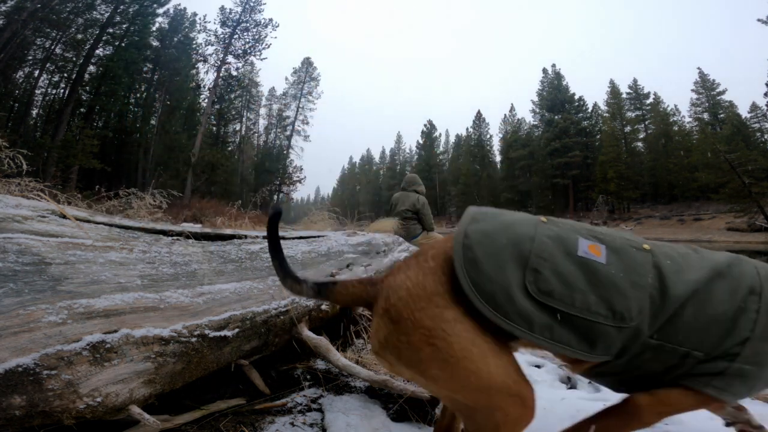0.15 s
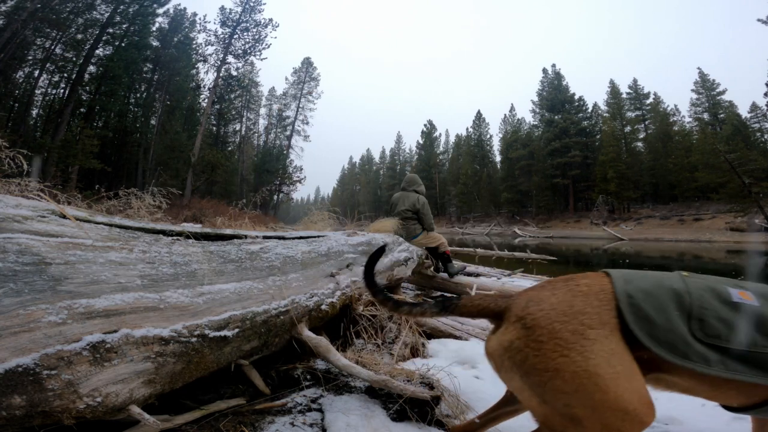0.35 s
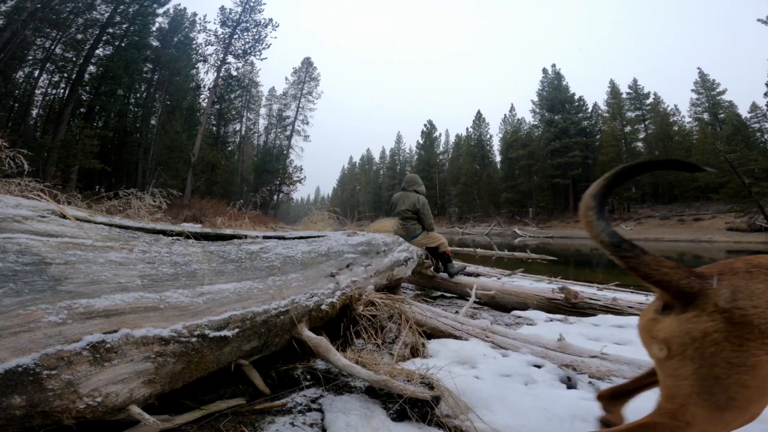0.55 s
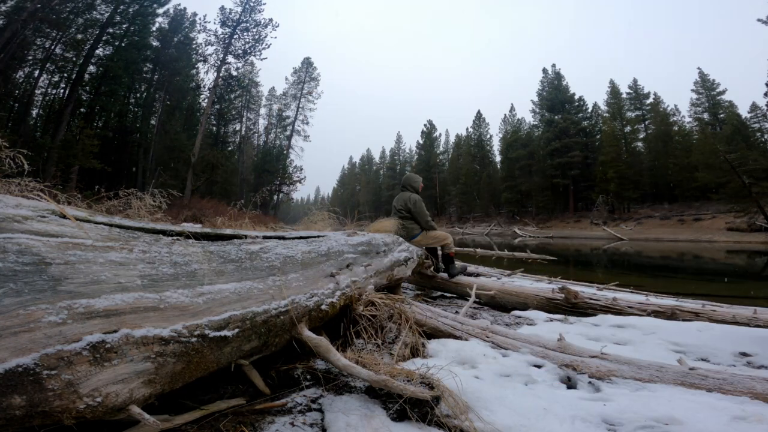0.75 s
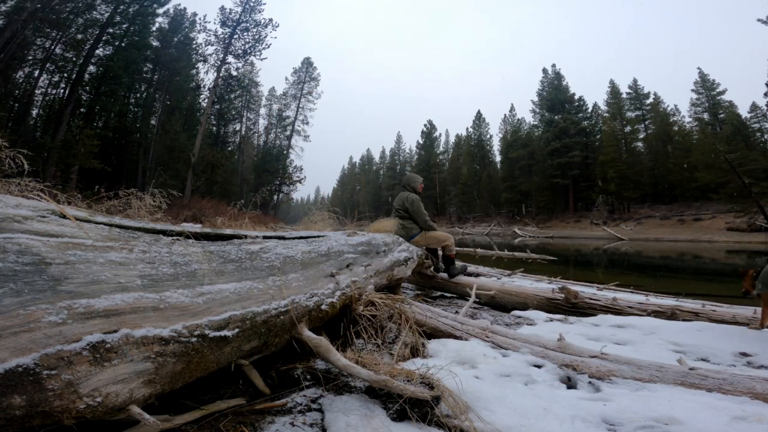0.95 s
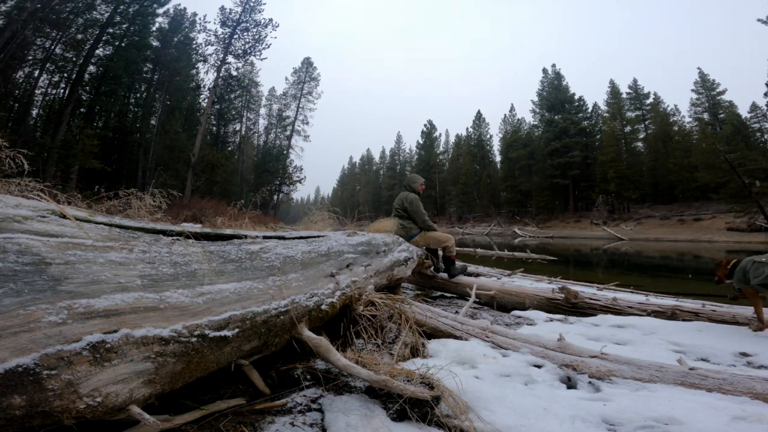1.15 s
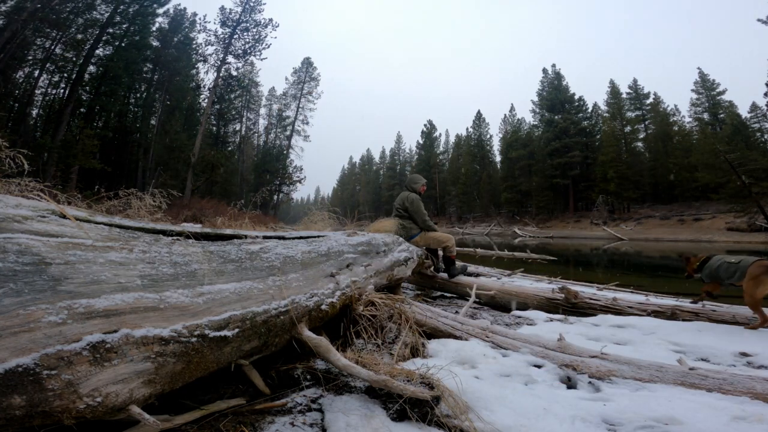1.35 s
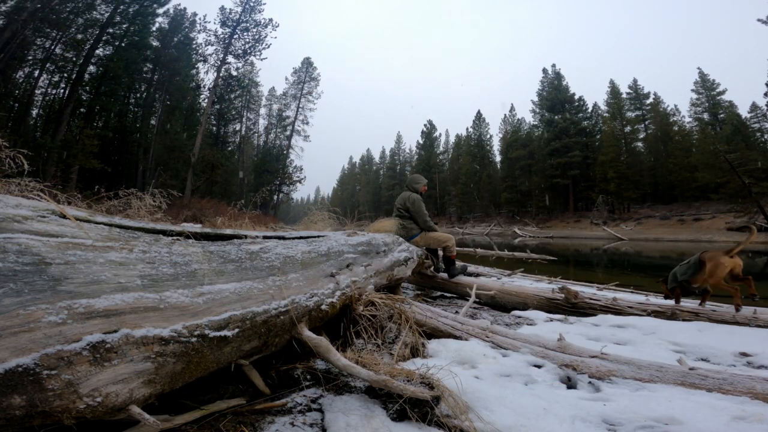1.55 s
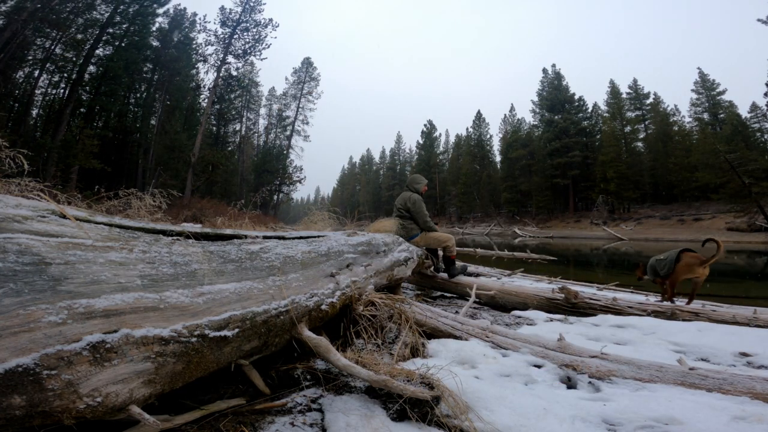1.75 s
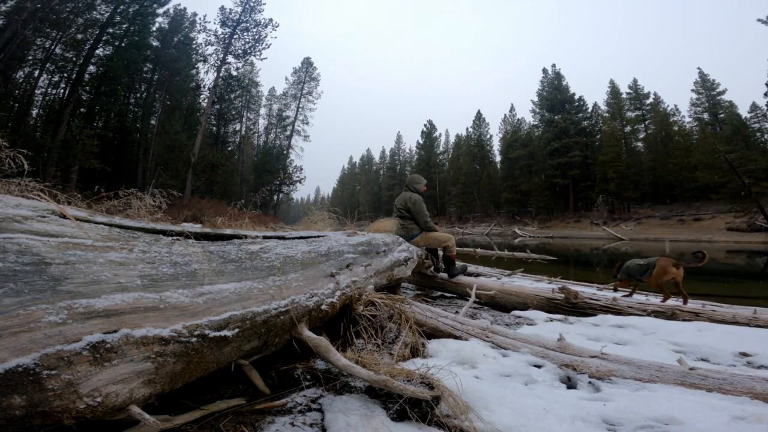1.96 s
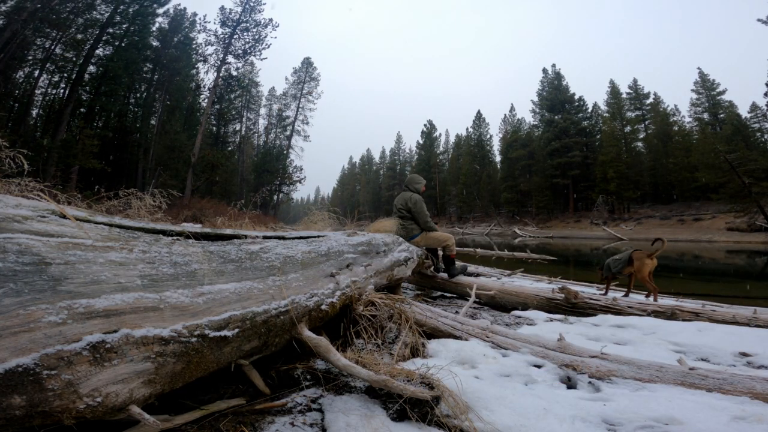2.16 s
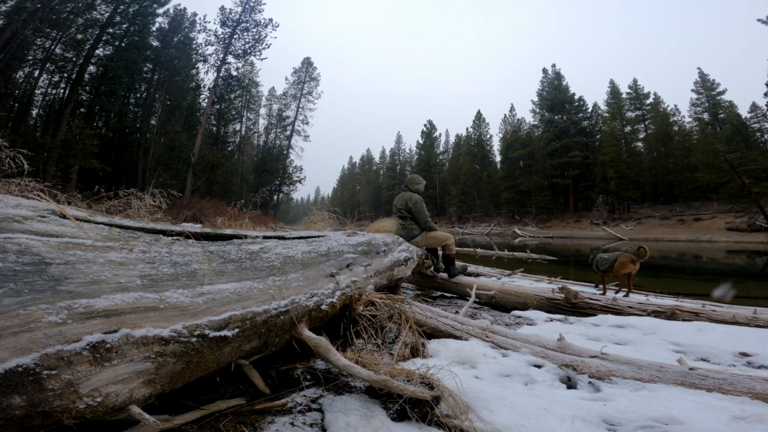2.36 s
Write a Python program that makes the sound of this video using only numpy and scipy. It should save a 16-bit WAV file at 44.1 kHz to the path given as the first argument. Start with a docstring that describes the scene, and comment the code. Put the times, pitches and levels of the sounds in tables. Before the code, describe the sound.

Dog jumping down from an icy log, scraping and snapping crust, then lighter steps receding right

```python
"""A dog jumps off a frosty log beside the listener: paws scrape, snap the crust, thump and knock on the log.
It trots away to the right along a river bank; on the left a small bird calls six times and the forest answers.
Farther off, packed snow squeaks under the paws, and near the end, before the last faint scrapes, a faint tone
rises and falls; a low hum lies under all. Crunches are noise from resonant ice grains, thumps, knocks and hum
are coloured noise, and squeaks, calls and the tone are sines of unsteady phase."""
import sys
import numpy as np
from scipy import signal
from scipy.fft import rfft, irfft, next_fast_len
from scipy.io import wavfile
from scipy.ndimage import uniform_filter1d, map_coordinates

SR = 44100
rng = np.random.default_rng(int(sys.argv[2]) if len(sys.argv) > 2 else 0)


def dump_mix(stems):
    """Bounce the given channels to the path in sys.argv[1] as a 16-bit WAV at rate SR."""
    frames = np.atleast_2d(stems).T  # one column per channel
    limited = np.clip(frames, -1, 1)  # hard clip at full scale
    pcm = np.round(limited * 32767).astype(np.int16)
    wavfile.write(sys.argv[1], SR, pcm)


N = 110250


def amp(db):
    """Amplitude ratio: every 20 dB is a factor of ten."""
    return 10 ** (np.asarray(db) / 20)


def unit(x):
    """Normalisation by mean power: scale to rms 1."""
    return x / np.sqrt(np.mean(x ** 2) + 1e-20)


def along(points, hz):
    """Spectral interpolation: values between (f/Hz, value) points on a log frequency axis."""
    f, value = np.transpose(points)
    return np.interp(np.log(hz + 1), np.log(f + 1), value)


def clock():
    """Sampled time: seconds at each sample."""
    return np.arange(N) / SR


def curves(rows):
    """Linear interpolation in time: one value per sample for each column after t/s."""
    s, *columns = np.transpose(rows)
    return [np.interp(clock(), s, column) for column in columns]


def wobble(rate, size=N):
    """Band-limited fluctuation: a smooth curve through random knots, rate of them a second."""
    knots = rng.standard_normal(size // 16 + 4)
    return map_coordinates(knots, [np.arange(size) * rate / SR])


def filtered(x, response):
    """Linear filtering: the spectrum of x times a response of frequency in Hz."""
    m = next_fast_len(N + SR // 2)  # padded against wrap-around
    return irfft(rfft(x, m) * response(np.fft.rfftfreq(m, 1 / SR)), m)[..., :N]


def noise(colour):
    """Spectral shaping: white noise coloured by (f/Hz, level/dB) points, at rms 1."""
    return unit(filtered(rng.standard_normal(N), lambda hz: amp(along(colour, hz))))


def steady(x, window_s):
    """Power levelling: divide a texture by its running rms."""
    power = uniform_filter1d(x ** 2, max(int(window_s * SR), 8))
    return x / np.sqrt(np.abs(power) + 1e-9)


def envelope(rows, attack_s, release_s):
    """Power addition of incoherent events: linear attack, hold and exponential release of each row."""
    t, power = clock(), np.zeros(N)
    for s, length, db in rows:
        near = slice(*np.searchsorted(t, [s - attack_s, s + length + 10 * release_s]))
        age = t[near] - s
        attack = np.clip(age / attack_s + .5, 0, 1)  # half-way up at the stated time
        release = np.exp(-np.maximum(age - length, 0) / release_s)
        power[near] += (amp(db) * attack * release) ** 2
    return np.sqrt(power)


def placed(s, sound):
    """Time shift: a short sound set at its time in silence."""
    return np.pad(sound, (round(s * SR), N))[:N]


def note(pitch_hz, rough):
    """Phase modulation: a sine whose phase trembles by about rough radians."""
    phase = 2 * np.pi * np.cumsum(pitch_hz) / SR
    return np.sin(phase + rough * wobble(900, size=len(pitch_hz)))


def spread(source):
    """Mid-side stereo: a central source with unrelated scatter from a second draw at the sides."""
    # how wide the scatter is: f/Hz, side level/dB
    side_width = [(60, -19.5), (160, -18), (300, -15), (600, -16.5), (1200, -15), (2500, -11),
                  (5000, -13.5), (9000, -16), (13000, -10)]
    mid = source()
    side = filtered(source(), lambda hz: amp(along(side_width, hz)))
    return np.array([mid + side, mid - side])


def air():
    """Coloured stationary noise: a wavering low hum with faint hiss."""
    # spectrum of the outdoor hum: f/Hz, level/dB
    hum_colour = [(20, -18), (105, -12.5), (135, -10), (160, 2.5), (210, 0), (270, -11), (400, -18.5),
                  (800, -35.5), (2000, -22.5), (6000, -29), (12000, -35), (16000, -64.5)]
    hum_db, waver_db = -66.5, 0.8
    return amp(hum_db + waver_db * wobble(7.73)) * noise(hum_colour)


def low_tone():
    """Frequency glide: one faint tone rises and falls."""
    # path of the tone: t/s, f/Hz, level/dB
    glide = [(2.16, 223, -68), (2.2, 309.4, -68.5), (2.245, 284, -67), (2.29, 218, -78.5)]
    hz, db = curves(glide)
    sounding = (clock() > glide[0][0]) * (clock() < glide[-1][0])
    return amp(db) * note(hz, 0.14) * sounding


def whistle(s, length, hz, fall, rough):
    """Frequency and amplitude modulation: one falling, fluttering note."""
    flutter_db = 2
    age = np.arange(SR // 20) / SR
    swell = np.abs(np.sin(np.pi * np.clip(age / length, 0, 1))) ** 0.44
    flutter = amp(flutter_db * wobble(250, size=len(age)))
    return placed(s, swell * flutter * note(hz - fall * age, rough))


def bird():
    """Superposition of partial whistles: a falling call, a high opening note and weaker trailing notes."""
    # calls: t/s, starting f/Hz, fall/(Hz/s), length/s, level/dB, level of the high opening note/dB
    chirps = [(0.824, 4700, 24000, 0.031, -50.5, -74), (0.946, 4890, 28000, 0.035, -44, -62),
              (1.069, 4825, 21200, 0.025, -42, -53), (1.19, 4745, 16500, 0.036, -42.5, -62),
              (1.32, 5024, 32000, 0.028, -44, -62), (1.454, 4807, 24000, 0.023, -41, -57)]
    # notes trailing each call: delay/s, frequency ratio to the main note, relative level/dB, roughness/rad
    side_notes = [(0.02, 0.541, -7.5, 0.73), (0.027, .8, -17, 0.77)]
    chirp_rough = 0.61
    high_ratio, high_s = 1.19, 0.021  # the opening note's pitch over the main one, and its length
    out = np.zeros(N)
    for s, hz, fall, length, db, high_db in chirps:
        out += amp(db) * whistle(s, length, hz, fall, chirp_rough)
        out += amp(high_db) * whistle(s, high_s, hz * high_ratio, 2 * fall, rough=0.72)
        for delay, ratio, rel_db, rough in side_notes:
            out += amp(db + rel_db) * whistle(s + delay, length, hz * ratio, fall * ratio, rough)
    return out


def forest(x):
    """Reverberation by convolution: trees return a long, patchy echo, the far bank a soft late one."""
    echo_db, t60_s, build_up_s, patchy_db = -5.5, 1.8, 0.037, 2.5
    bank_db, bank_delay_s, bank_width_s = -18, 0.286, 0.014
    t = clock()
    decay = amp(-60 * t / t60_s + patchy_db * wobble(37))
    trees = amp(echo_db) * unit(decay * (1 - np.exp(-t / build_up_s)))
    bank = amp(bank_db) * unit(np.exp(-((t - bank_delay_s) / bank_width_s) ** 2))
    tail = rng.standard_normal((2, N))
    tail = unit(tail + tail.mean(axis=0))  # left and right partly alike
    echo = tail * (trees + bank) / np.sqrt(N)
    return signal.fftconvolve(x[None], echo, axes=1)[:, :N]


def squeaks():
    """Stick-slip: each slip of packed snow sings for a few falling cycles around its peak."""
    # slips of packed snow: t of the peak/s, width/s, f at the peak/Hz, peak level/dB
    slips = [(1.590, 0.0048, 1750, -41.5), (1.598, 0.0022, 1657, -30.5), (1.611, 0.0051, 1740, -41),
             (1.664, 0.0022, 1620, -40.5), (1.857, 0.0041, 1980, -52), (1.874, 0.0022, 1900, -36),
             (1.879, 0.0016, 1823, -35), (1.887, 0.0022, 1885, -37), (1.9, 0.0021, 1874, -33),
             (2.037, .002, 1500, -62)]
    rough, sag_hz_per_s = 0.56, 12000
    t = np.arange(-SR // 50, SR // 50) / SR  # time from the peak
    out = np.zeros(N)
    for s, width, hz, db in slips:
        swell = np.exp(-.5 * (t / width) ** 2)
        out += placed(s + t[0], amp(db) * swell * note(hz - sag_hz_per_s * t, rough))
    return out


def footfalls():
    """Impact noise: low thumps and hollow knocks under the paws."""
    # the dog's weight on log and ground: t/s, length/s, level/dB
    thump_rows = [(0, 0.051, -50), (.045, .1, -60), (.205, 0.048, -42.5), (.25, 0.026, -34),
                  (.293, 0.1, -44), (.402, 0.03, -54.5), (.54, 0.044, -52), (.585, 0.035, -55),
                  (.632, 0.024, -51.5), (.928, .02, -74), (1.205, .015, -67), (1.512, 0.019, -50.5),
                  (1.54, 0.042, -60.5), (1.608, 0.019, -56.5)]
    # hollow knocks of paws on driftwood: t/s, length/s, level/dB
    knock_rows = [(.24, 0.034, -47), (.33, 0.06, -49), (.575, 0.027, -45.5), (.70, 0.069, -64),
                  (.86, 0.035, -62.5), (.918, .025, -55), (1.195, 0.022, -58), (1.27, 0.025, -55),
                  (1.35, 0.031, -60), (1.605, .02, -51.5), (1.652, .025, -59), (1.932, .025, -54),
                  (1.985, 0.031, -60.5), (2.145, 0.013, -59)]
    # spectra of thump and of knock: f/Hz, level/dB
    thump_colour = [(20, -26.5), (40, -16), (62, -3.5), (110, -6), (150, -8.5), (260, -33), (600, -60)]
    knock_colour = [(50, -52.5), (110, -33), (155, 9.5), (200, -2.5), (300, -16), (700, -57)]
    thumps = steady(noise(thump_colour), 0.05) * envelope(thump_rows, attack_s=0.015, release_s=0.0049)
    knocks = steady(noise(knock_colour), 0.012) * envelope(knock_rows, attack_s=.009, release_s=0.014)
    return thumps + knocks


def grains(count=14):
    """Random impulses exciting resonators: ice grains ring briefly in clumps, coloured by crust and log."""
    # response of the snow crust: f/Hz, level/dB
    crust = [(70, -14), (160, 4), (280, -11), (350, -4.5), (500, -6.5), (700, -7), (850, -7), (1050, -1.5),
             (1500, 0), (2400, -1), (5000, 0), (7200, -3), (11700, -13), (15500, -27)]
    # resonances of the log: f/Hz, width/Hz, level before the common offset/dB
    wood = [(331, 25, 4.5), (502, 30, -6), (1040, 11.7, -4), (1600, 93, -20), (2029, 22, 1.5)]
    wood_offset_db = -6
    grains_per_s, grain_q = 22000, 3.15  # all pitches together; sharpness of each grain's ring
    size_spread_db, powder_db, clump_db = 3.6, -9, 2.1
    pitches = np.geomspace(200, 14000, count)
    shares = np.sqrt(pitches) / np.sqrt(pitches).sum()  # more of the higher grains
    out = amp(powder_db) * rng.standard_normal(N)
    for hz, share in zip(pitches, shares):
        n = int(grains_per_s * share * N / SR)
        sizes = amp(size_spread_db * np.minimum(rng.exponential(size=n), 3))
        sizes = sizes * rng.choice([-1, 1], n)
        impulses = unit(np.bincount(rng.integers(0, N, n), sizes, N))
        out = out + signal.lfilter(*signal.iirpeak(hz, grain_q, SR), impulses)

    def ring(f):
        """Modal summation: the log's damped resonances add up."""
        return sum(amp(db + wood_offset_db) * 1j * f * width / (centre * centre - f * f + 1j * f * width)
                   for centre, width, db in wood)

    clumped = out * amp(clump_db * wobble(220))
    return unit(filtered(clumped, lambda f: amp(along(crust, f)) * (1 + ring(f))))


def crunch():
    """Band-wise modulation: scrapes and snaps shape grain noise in four bands, over a rustle of loose frost."""
    # paws scraping and crunching: t/s, length/s, then level/dB of body, mids, treble, fizz
    scrapes = np.array([(0.002, 0.016, -50, -51, -60, -55.5), (0.023, 0.12, -64.5, -61, -55.5, -59.5),
                        (0.12, 0.034, -57, -51, -46, -47.5), (0.158, 0.071, -42, -39, -36, -40.5),
                        (0.201, 0.03, -34.5, -33, -29.5, -30.5), (0.238, 0.022, -34, -31, -35, -32.5),
                        (0.256, 0.03, -52.5, -49, -49.5, -50), (0.292, 0.027, -40, -41, -40, -38),
                        (0.325, 0.057, -41, -39, -43, -46), (0.388, 0.062, -71, -81, -62.5, -59.5),
                        (0.456, 0.033, -61, -56, -53, -51.5), (0.499, 0.05, -47, -51, -44.5, -47.5),
                        (0.573, 0.017, -43, -41, -38, -43.5), (0.596, 0.031, -56, -57, -50.5, -53.5),
                        (0.702, 0.017, -58.5, -60.5, -61.5, -57.5),
                        (0.741, 0.026, -61.5, -62, -57.5, -56.5), (0.826, 0.031, -66, -66, -66, -59),
                        (0.851, 0.053, -55.5, -56.5, -56, -55.5), (0.914, 0.013, -50.5, -52, -52.5, -50.5),
                        (0.939, 0.023, -55, -60, -53.5, -59), (0.984, 0.015, -66, -60, -54.5, -64),
                        (1.097, 0.023, -59, -60, -51.5, -59), (1.159, 0.028, -68.5, -59, -69, -61),
                        (1.189, 0.02, -54.5, -52.5, -50, -52.5), (1.232, 0.024, -61, -59, -55, -57),
                        (1.33, 0.048, -71.5, -68.5, -60, -63), (1.486, 0.022, -56, -59.5, -54, -54.5),
                        (1.511, 0.052, -65, -57, -55, -61), (1.587, 0.036, -60, -47, -47, -55.5),
                        (1.87, 0.016, -81, -53, -47, -61), (1.893, 0.033, -71.5, -53.5, -46.5, -64),
                        (1.983, 0.02, -77, -54.5, -58.5, -63), (2.075, 0.02, -85, -61, -59, -69),
                        (2.138, 0.047, -80, -65, -60.5, -70), (2.358, 0.026, -75.5, -71.5, -67.5, -72.5),
                        (2.4, 0.041, -76, -70, -65.5, -70)])
    # crust and twigs snapping: t/s, length/s, then level/dB of body, mids, treble, fizz
    snaps = np.array([(0.026,0.0062,-46.5,-46,-40.5,-41), (.059,0.0015,-70,-52,-48.5,-65),
                      (0.07,0.0017,-70,-65,-50.5,-65), (0.209,0.0048,-49,-49,-24,-27),
                      (0.245,0.0034,-30,-27,-28.5,-31), (0.412,0.0035,-70,-62,-46.5,-64),
                      (0.438,0.0015,-74,-61,-54,-45), (0.562,0.0066,-38.5,-34,-34.5,-35.5),
                      (0.641,0.0063,-47.5,-52,-53.5,-55.5), (0.688,0.005,-54.5,-57.5,-55.5,-50.5),
                      (0.93,0.0027,-40,-49.5,-52,-45.5), (1.006,0.006,-53,-56.5,-49,-55),
                      (1.069,0.0068,-65,-66,-57,-61.5), (1.275,0.0075,-58,-61,-56,-58),
                      (1.291,0.0061,-55,-55.5,-53,-54.5), (1.431,0.0084,-56.5,-57,-52,-52),
                      (1.659,0.0059,-67,-53,-50,-68), (1.915,0.0022,-63,-60,-44.5,-54.5),
                      (1.936,0.0039,-76,-53,-47.5,-63), (1.977,0.0036,-69.5,-57,-54.5,-64),
                      (2.035,0.0039,-74,-58,-66,-67), (2.097,0.002,-82,-61,-63.5,-75),
                      (2.166,0.0034,-73,-64,-49,-70), (2.23,.003,-78,-86,-61,-68),
                      (2.264,0.0035,-74,-77.5,-60.5,-61.5), (2.356,0.0032,-74,-68,-57.5,-54)])
    # edges of those four bands: f/Hz
    band_edges = [180, 900, 2500, 6000, 15000]
    # loose frost between the steps: t/s, level before the common offset/dB
    rustle = [(0.0, -31.5), (0.14, -47), (0.42, -43), (0.66, -54), (0.93, -58), (1.08, -46), (1.24, -56.5),
              (1.46, -43), (1.65, -51), (2.05, -55.5), (2.4, -60), (2.5, -62.5)]
    rustle_offset_db = -15
    texture = grains()
    # shifted by half the length so that the rustle uses other grains than the bursts above it
    out = amp(curves(rustle)[0] + rustle_offset_db) * np.roll(texture, N // 2)
    for k, (lo, hi) in enumerate(zip(band_edges, band_edges[1:])):
        band = filtered(texture, lambda f: 1 / (1 + (f / hi) ** 10) / (1 + (lo / (f + 1)) ** 10))
        columns = [0, 1, k + 2]
        scrape_level = envelope(scrapes[:, columns], attack_s=0.012, release_s=0.0083)
        snap_level = envelope(snaps[:, columns], attack_s=0.0011, release_s=0.0027)
        out = out + steady(band, window_s=0.009) * np.hypot(scrape_level, snap_level)
    return out


def ground(x):
    """Destructive interference: once the dog is away, the bounce off the snow hollows out the low mids."""
    notch_hz, notch_width_hz, depth = 720, 110, 0.68
    away_s, fade_s = 0.673, 0.045
    away = np.clip((clock() - away_s) / fade_s, 0, 1)
    return x - away * filtered(x, lambda hz: depth * np.exp(-((hz - notch_hz) / notch_width_hz) ** 2))


def scene():
    """Stereo by level and time difference: the dog moves off to the right; bird and air stay put."""
    # position of the dog: t/s, left minus right level/dB
    dog_pan = [(0, -.3), (.45, -.6), (.8, -1.5), (1.1, -2.5), (1.45, -3), (1.62, -4), (1.9, -4), (2.4, -5)]
    bird_pan_db, lag_s = 4.8, .00001  # left minus right level; the dog's lag of left behind right
    sides = np.array([[.5], [-.5]])
    dog = ground(spread(crunch)) + spread(footfalls) + squeaks()
    dog = dog * amp(sides * curves(dog_pan)[0])
    dog = filtered(dog, lambda hz: np.exp(-2j * np.pi * hz * lag_s * sides))
    calls = bird()
    return dog + calls * amp(sides * bird_pan_db) + forest(calls) + spread(air) + low_tone()


def record(dry):
    """Band limitation: nothing is kept above the top frequency."""
    top_hz = 15750
    return filtered(dry, lambda hz: hz < top_hz)


dry = scene()
out = record(dry)
dump_mix(out)
```